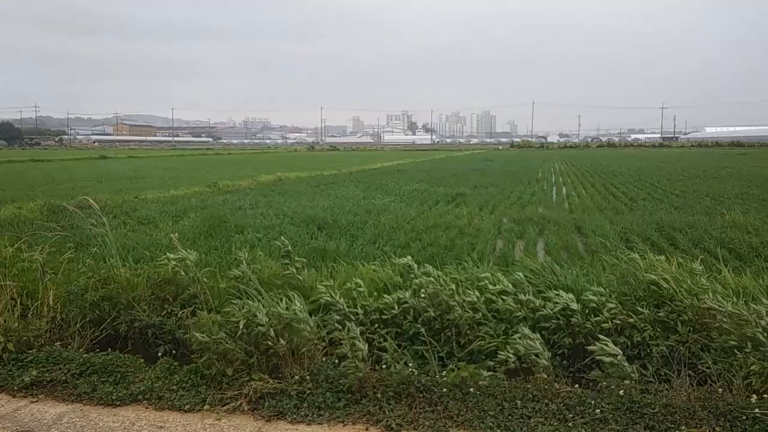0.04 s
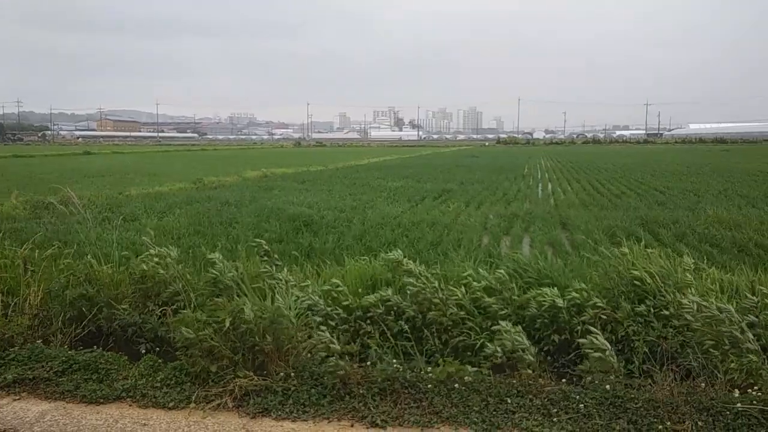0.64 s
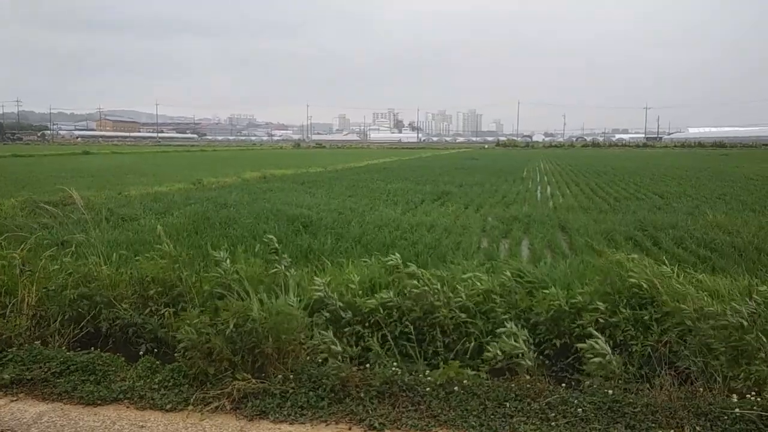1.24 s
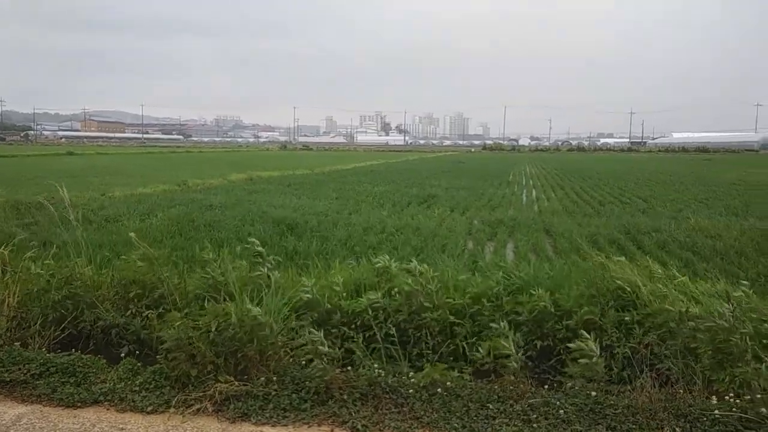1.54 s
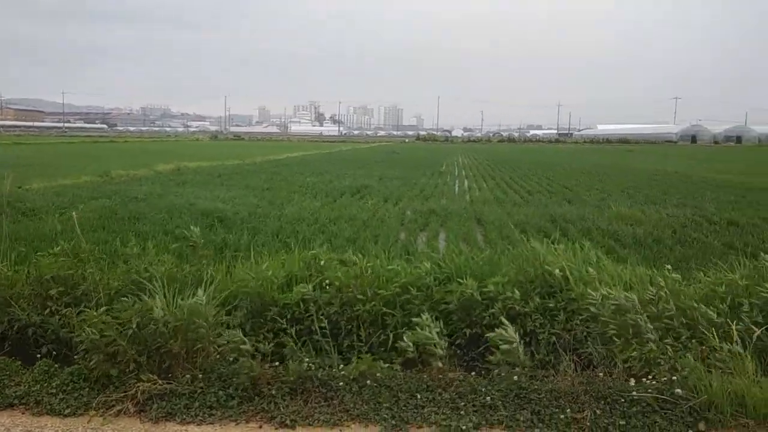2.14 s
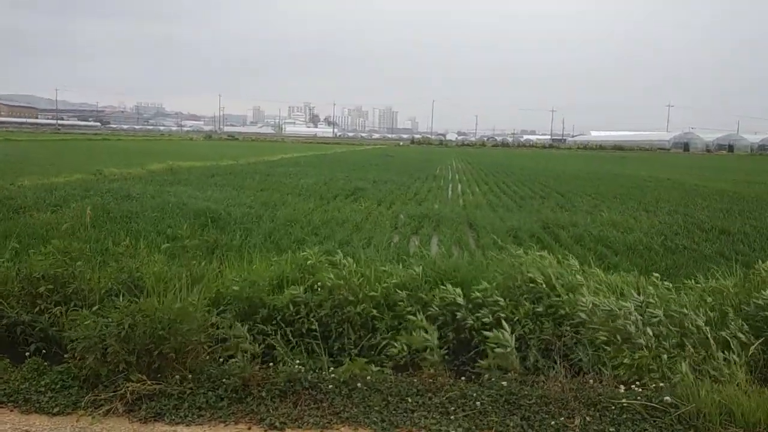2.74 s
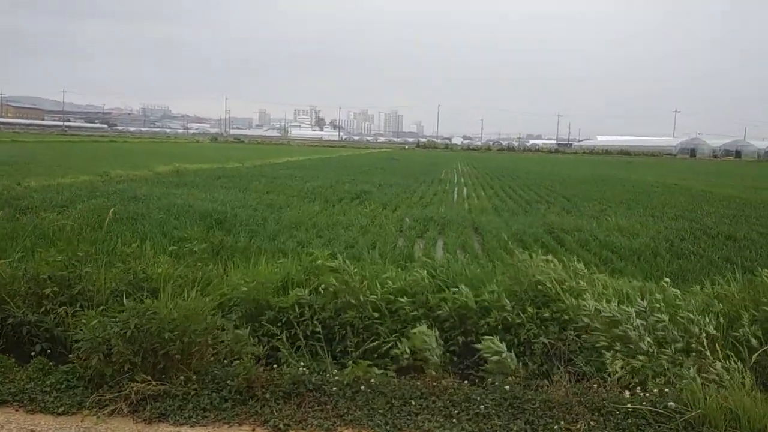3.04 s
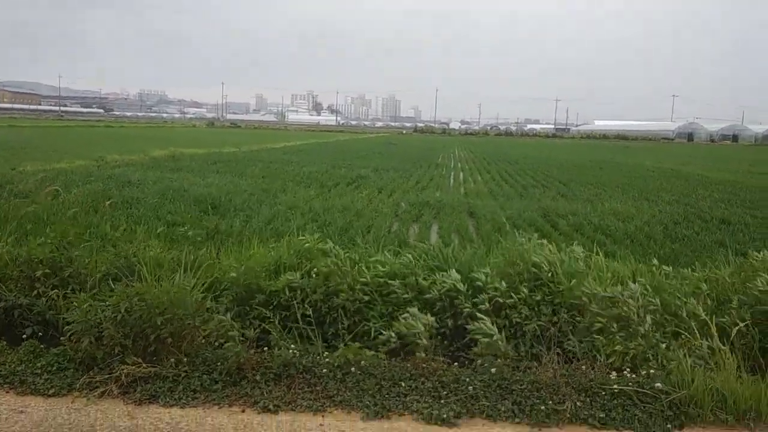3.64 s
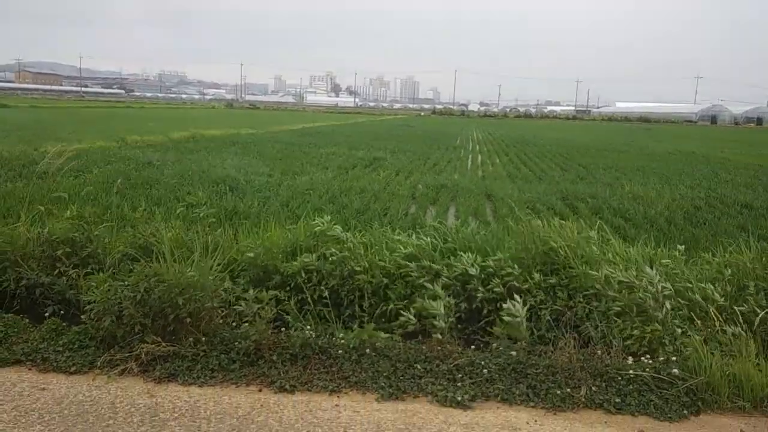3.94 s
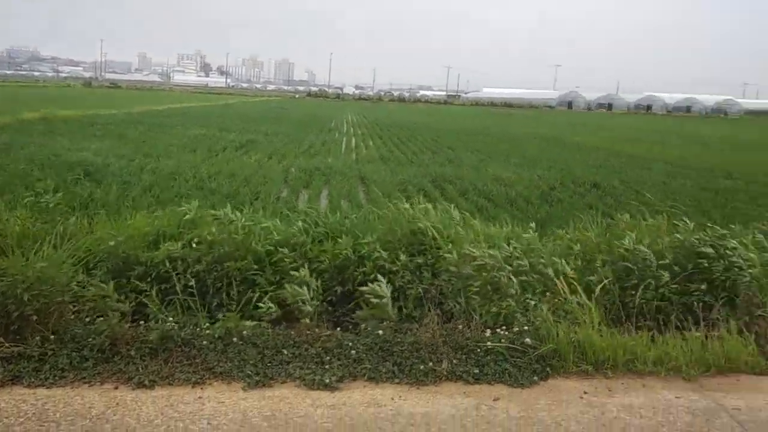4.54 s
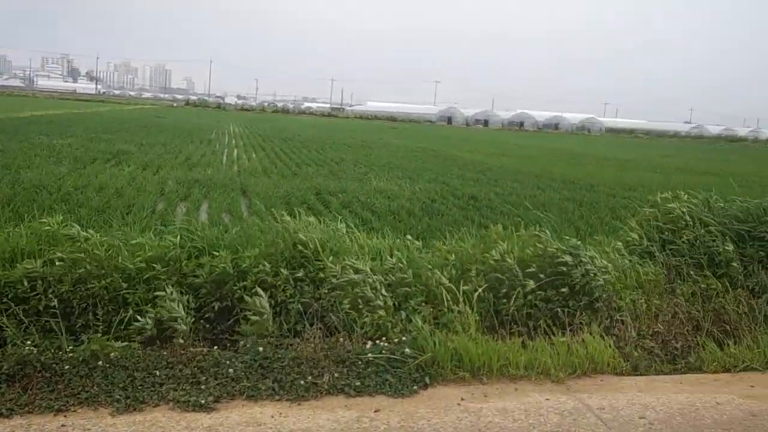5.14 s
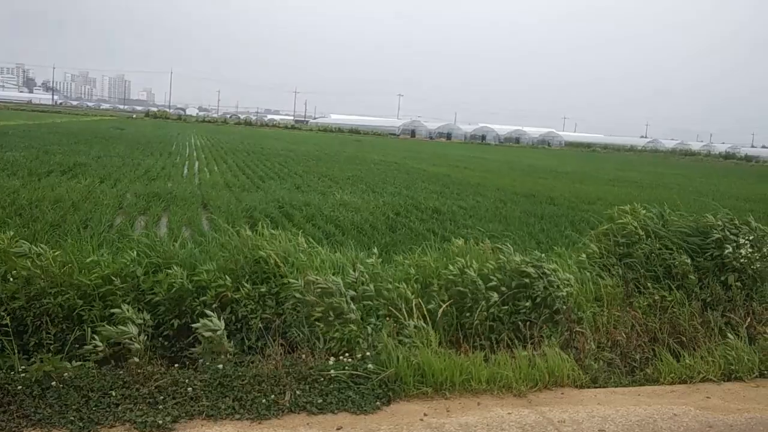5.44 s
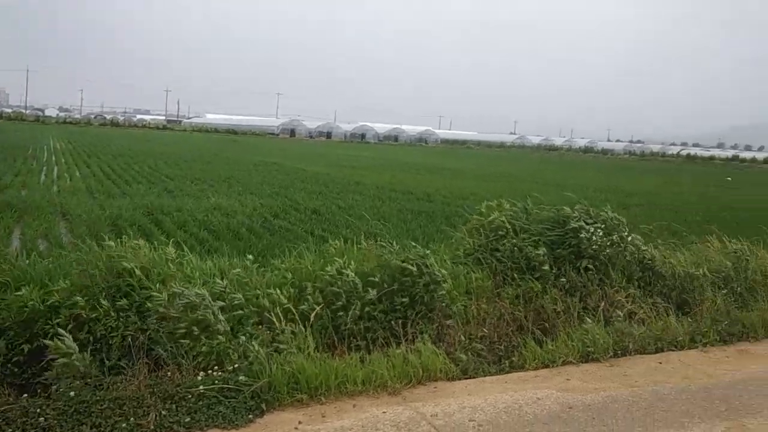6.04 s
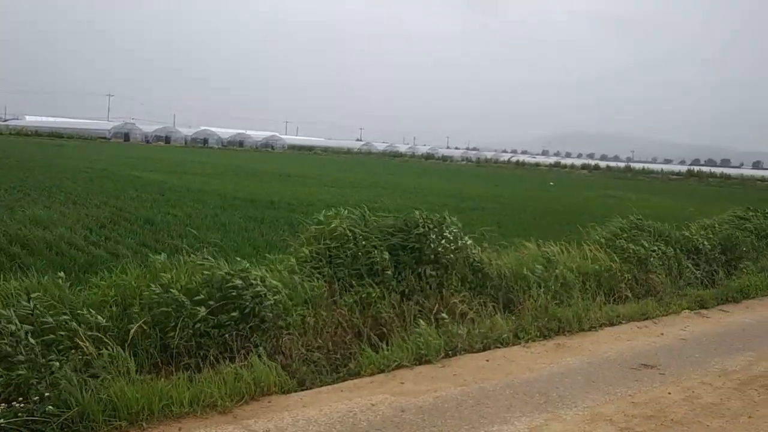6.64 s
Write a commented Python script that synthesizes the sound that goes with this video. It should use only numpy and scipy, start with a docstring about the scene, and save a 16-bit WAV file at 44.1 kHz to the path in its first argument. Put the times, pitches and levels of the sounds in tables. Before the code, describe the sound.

Gusts hiss through tall grass and leaves, then ease into a steady rush of wind across a field, with occasional small clicks.

```python
"""Open rice field in wind, heard from a track beside a strip of reeds and tall grass.
The far field rushes steadily; gusts, strong at first and then weaker, sweep the near reeds,
whose leaves brush and patter. Dry seed heads sizzle, stalks tick now and then,
and eddies bump softly on a single, bass-shy microphone."""
import sys
import numpy as np
from scipy import signal
from scipy.fft import rfft, irfft
from scipy.io import wavfile

SR = 44100
rng = np.random.default_rng(int(sys.argv[2]) if len(sys.argv) > 2 else 0)


def transcribe(u):
    """Save the signal u as a 16-bit wav file named by the first command-line argument.

    u: samples, shape (n,) or (channels, n), limited to [-1, 1]; the rate is SR.
    q: integer samples, one column per channel.
    """
    v = np.clip(np.atleast_2d(u).T, -1, 1)
    q = np.round(v * 32767).astype(np.int16)
    wavfile.write(sys.argv[1], SR, q)


N = 303849
TIME_S = np.arange(N) / SR


def undb(db):
    """Decibels to gain."""
    return 10 ** (np.asarray(db) / 20)


def unit(x):
    """Scale to rms 1."""
    return x / np.sqrt(np.mean(x ** 2))


def colour(x, spectrum):
    """Filter by rows of freq_hz, gain_db; rms 1."""
    freq_hz, gain_db = np.transpose(spectrum)
    bin_hz = np.maximum(np.arange(N // 2 + 1) * SR / N, 1)
    bin_db = np.interp(np.log(bin_hz), np.log(freq_hz), gain_db)
    return unit(irfft(rfft(x) * undb(bin_db), N))


def wander(rate_hz):
    """Straight lines through `rate_hz` random values a second; rms 1."""
    knots = rng.standard_normal(1024)
    return unit(np.interp(TIME_S * rate_hz, np.arange(len(knots)), knots))


def swaying_noise(sway_db, sway_hz, flutter_db, flutter_hz, bands=10):
    """Octave bands of noise that sway together and flutter alone; rms 1."""
    bins = np.maximum(np.arange(N // 2 + 1), 1)
    octave = np.maximum(np.log2(bins / (N / 2)) + bands - 1, 0)
    noise = rfft(rng.standard_normal(N))
    out = np.zeros(N)
    for k in range(bands):
        band = irfft(noise * np.clip(1 - abs(octave - k), 0, 1), N)
        out += band * undb(flutter_db * wander(flutter_hz))
    return unit(out * undb(sway_db * wander(sway_hz)))


def contacts(rate_per_s, spread_db, scrape_s):
    """Random touches, each a tiny scrape, a few much harder than the rest; rms 1."""
    strength = undb(spread_db * np.minimum(rng.exponential(size=N), 5))
    touches = (rng.random(N) < rate_per_s / SR) * strength ** 2
    decay = np.exp(-1 / (scrape_s * SR))
    energy = signal.lfilter([1], [1, -decay], touches + 1e-12)
    return unit(np.sqrt(energy) * rng.standard_normal(N))


def field(level_db=-34.5):
    """Countless far plants merge into a smooth rush."""
    # rush spectrum: freq_hz, gain_db
    spectrum = [(30, -52), (70, -42), (110, -27.5), (200, -8.5), (350, -1), (700, 0), (1300, -2),
                (2150, -3), (3000, -8), (4700, -9.5), (5600, -21), (8000, -27.5), (11000, -28),
                (15500, -33.5)]
    rush = swaying_noise(sway_db=-0.24, sway_hz=7, flutter_db=0.58, flutter_hz=12)
    return undb(level_db) * colour(rush, spectrum)


def wind(breeze_db=-40):
    """Wind strength in the reeds: a steady breeze and passing gusts add in power."""
    # gusts: peak_s, level_db, rise_s, fall_s
    gusts = [(.35, -31, 0.8, 0.46), (1.35, -29.5, 0.39, 0.49), (2.43, -34.5, 0.2, 0.45),
             (3.98, -38.5, 0.36, 0.21), (4.78, -37.5, .14, 0.58), (6.8, -42, 0.091, .2)]
    power = undb(breeze_db) ** 2
    for peak_s, level_db, rise_s, fall_s in gusts:
        age_s = TIME_S - peak_s
        sigma_s = np.where(age_s < 0, rise_s, fall_s)
        power = power + undb(level_db) ** 2 * np.exp(-(age_s / sigma_s) ** 2 / 2)
    return np.sqrt(power)


def reeds(patter_db=-4.5):
    """Air hisses through the near reeds; the stronger the wind, the more often leaves collide."""
    # leaf rustle spectrum: freq_hz, gain_db
    spectrum = [(70, -64), (150, -25.5), (260, -12.5), (380, -3.5), (700, -6.5), (1100, -2), (2400, 0.5),
                (3250, -6), (4850, -10), (6000, -18.5), (8000, -30.5), (9500, -29.5), (12500, -31),
                (15500, -35)]
    strength = wind()
    hiss = swaying_noise(sway_db=0.6, sway_hz=14, flutter_db=0.4, flutter_hz=18)
    patter = contacts(rate_per_s=1800 * unit(strength), spread_db=3.0, scrape_s=0.0013)
    return strength * colour(hiss + undb(patter_db) * patter, spectrum)


def grass():
    """Dry seed heads brush in fine grains, louder as the stems swing together."""
    # sizzle spectrum: freq_hz, gain_db
    spectrum = [(7500, -16), (9200, -1.5), (11800, -3.5), (13200, -6), (15500, -8)]
    # sizzle envelope: time_s, level_db
    envelope = [(0, -60), (1.35, -57.5), (2.1, -74), (2.8, -71), (3.3, -58), (4.4, -60), (5.4, -57.5),
                (6.9, -56.5)]
    level_db = np.interp(TIME_S, *np.transpose(envelope))
    swing_db = 1.6 * wander(rate_hz=7.7)
    grains = contacts(rate_per_s=600, spread_db=1.5, scrape_s=0.0009)
    return undb(level_db + swing_db) * colour(grains, spectrum)


def eddies(sigma_s=0.025, weak_per_s=1.5, weak_db=-62):
    """Eddies pass the microphone as soft low bumps: a few strong ones, weak ones at random."""
    # eddy spectrum: freq_hz, gain_db
    spectrum = [(30, -32), (65, -31), (105, -3), (160, 4), (260, 6), (500, -33)]
    # strong eddies: peak_s, level_db
    strong = [(.98, -56), (2.64, -52.5), (2.72, -46), (2.901, -46.5), (3.744, -52), (4.48, -54),
              (4.623, -53), (5.985, -50), (6.06, -51), (6.223, -54)]
    gaps_s = rng.uniform(0.5, 1.5, 32) / weak_per_s
    weak = [(peak_s, weak_db) for peak_s in np.cumsum(gaps_s) if peak_s < TIME_S[-1]]
    envelope = np.zeros(N)
    for peak_s, level_db in strong + weak:
        envelope += undb(level_db) * np.exp(-((TIME_S - peak_s) / sigma_s) ** 2 / 2)
    return envelope * colour(rng.standard_normal(N), spectrum)


def stalks():
    """Each touch is a dying scrape that rings a narrow band: stiff, well damped stalks tick high, and near reed
    leaves brush lower and louder."""
    # stalk knocks and leaf brushes: start_s, level_db, centre_hz, width_hz, t60_s
    ticks = [(1.054, -47, 10000, 5000, .01), (2.119, -24, 2100, 900, 0.013),
             (2.363, -20.5, 2460, 800, 0.025), (3.255, -48, 11000, 7000, .09),
             (4.295, -51, 13500, 4000, .06), (4.349, -42, 13000, 4000, .01), (4.461, -45, 6500, 1500, .04),
             (4.658, -41, 6200, 2000, .015), (6.704, -39.5, 7000, 900, .018)]
    out = np.zeros(N)
    for start_s, level_db, centre_hz, width_hz, t60_s in ticks:
        age_s = TIME_S - start_s
        envelope = (age_s >= 0) * np.exp(-np.log(1000) * abs(age_s) / t60_s)
        scrape = envelope * rng.standard_normal(N)
        resonance = signal.iirpeak(centre_hz, centre_hz / width_hz, fs=SR)
        # two passes for steep skirts
        ring = signal.lfilter(*resonance, signal.lfilter(*resonance, scrape + 1e-18))
        makeup = np.sqrt(SR / 2 / width_hz)  # a narrow band passes less of the scrape
        out += undb(level_db) * makeup * ring
    return out


def scene():
    """One microphone feeds both channels."""
    plants = field() + reeds() + grass() + stalks()
    mono = plants + eddies()
    return np.array([mono, mono])


def record(dry):
    """The recorder cuts the top steeply."""
    cutoff_hz = 15750
    lowpass = signal.ellip(12, 0.05, 60, cutoff_hz, fs=SR, output="sos")
    return signal.sosfiltfilt(lowpass, dry)


dry = scene()
out = record(dry)
transcribe(out)
```